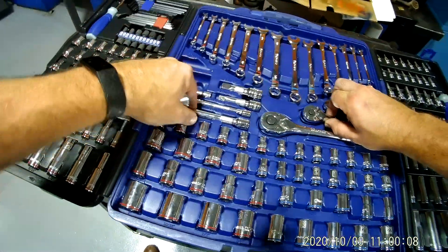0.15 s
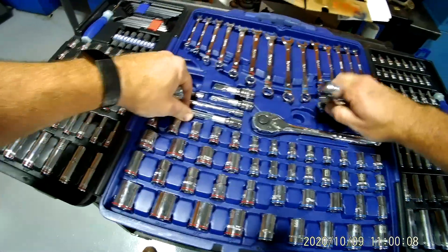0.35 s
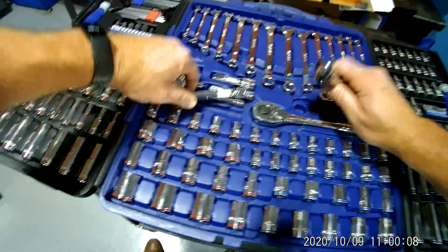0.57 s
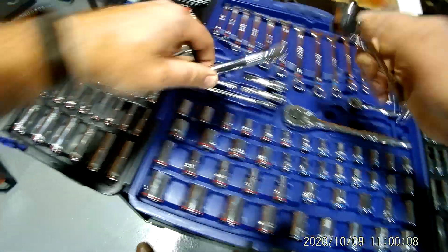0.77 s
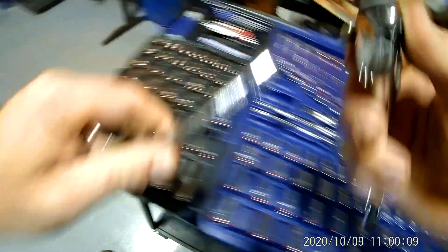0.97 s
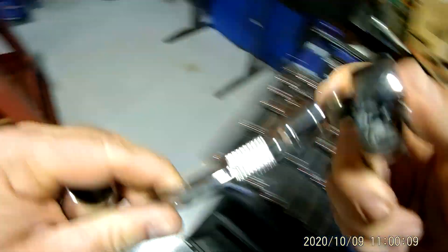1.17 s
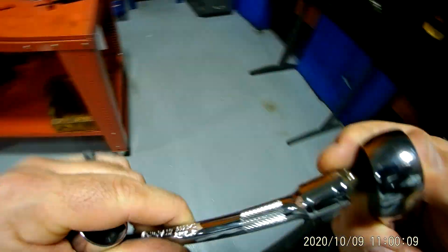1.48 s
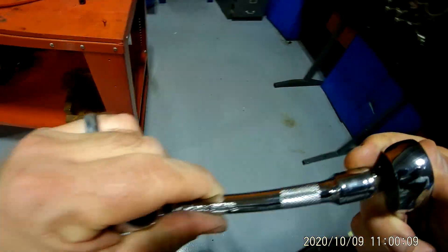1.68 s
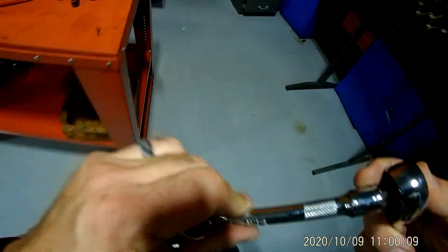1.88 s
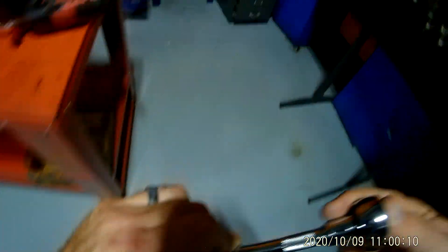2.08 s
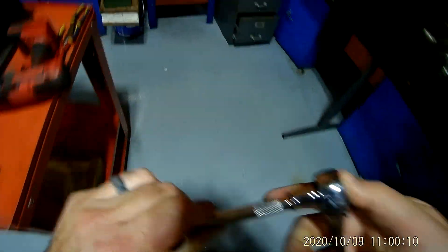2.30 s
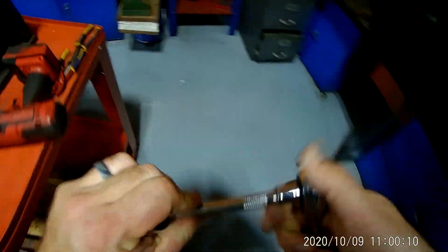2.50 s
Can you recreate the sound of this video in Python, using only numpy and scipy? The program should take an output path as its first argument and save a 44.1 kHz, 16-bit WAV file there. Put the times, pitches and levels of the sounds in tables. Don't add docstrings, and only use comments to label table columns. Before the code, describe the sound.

Steel ratchet and extension bar knock out of a hollow plastic tool tray, click together, then rattle

```python
import sys
import numpy as np
from scipy import signal
from scipy.fft import rfft, irfft
from scipy.io import wavfile
from scipy.ndimage import uniform_filter1d

SR = 44100
rng = np.random.default_rng(int(sys.argv[2]) if len(sys.argv) > 2 else 0)


def linear_from_db(decibels):
    return 10 ** (np.asarray(decibels, float) / 20)


def to_wav(sig):
    pcm = np.clip(np.atleast_2d(sig), -1, 1) * 32767
    pcm = np.round(pcm).astype(np.int16)
    wavfile.write(sys.argv[1], SR, pcm.T)


N = 116865

# hz, level_db_per_hz
STEEL_CONTACT = [(500, -21.5), (1600, -0.5), (2600, -9), (4200, 0), (6900, -3), (8300, -17), (10000, -14),
                 (16000, -30)]


def evened(x):
    return x / np.sqrt(np.mean(x ** 2) + 1e-20)


def add(mix, start_s, sound):
    part = mix[round(start_s * SR):][:len(sound)]
    part += sound[:len(part)]


def noise(colour, size):
    colour_hz, colour_db = np.transpose(colour)
    hz = np.fft.rfftfreq(size, 1 / SR)
    level_db = np.interp(np.log(hz + 1), np.log(colour_hz + 1), colour_db)
    return evened(irfft(rfft(rng.standard_normal(size)) * linear_from_db(level_db), size))


def ring(modes, spread_db, detune, rise_s):
    wobble, wobble_s = 0.006, 0.002
    hz, db, t60_s = np.transpose(modes)[:, :, None]
    t = np.arange(16384) / SR
    level_draw, pitch_draw = rng.standard_normal((2, len(modes), 1))
    knots_s = np.arange(0, 16384 / SR, wobble_s)
    steps = rng.standard_normal((len(modes), len(knots_s)))
    drift_s = np.array([np.interp(t, knots_s, wobble * wobble_s * np.cumsum(w)) for w in steps])
    turns = hz * ((1 + detune * pitch_draw) * t + drift_s * hz / 8000)
    decay = linear_from_db(db + spread_db * level_draw - 60 * t / t60_s)
    return (decay * np.sin(2 * np.pi * turns)).sum(0) * (1 - np.exp(-t / rise_s))


def crack(colour, t60_s):
    t = np.arange(4096) / SR
    return noise(colour, size=4096) * linear_from_db(-60 * t / t60_s) * np.minimum(t / 0.0004, 1)


def steel(hits, modes, crack_t60_s):
    out = np.zeros(N)
    for start_s, peak_db, crack_db in hits:
        add(out, start_s, linear_from_db(peak_db - 6) * ring(modes, spread_db=2, detune=0.004, rise_s=0.0003))
        add(out, start_s, linear_from_db(peak_db + crack_db - 9) * crack(STEEL_CONTACT, crack_t60_s))
    return out


def room_air():
    # hz, level_db_per_hz
    air_colour = [(20, -7), (145, -2), (480, -7), (1700, -22.5), (2800, -24), (4200, -32), (8000, -33),
                  (15800, -31)]
    return linear_from_db(-61) * noise(air_colour, size=N)


def rubbing():
    # start_s, level_db
    motion = [(0, -65), (.06, -62), (.19, -67.5), (0.228, -46.5), (.5, -46), (0.8, -53), (1.219, -62.5),
              (1.282, -54), (1.45, -71), (1.898, -67), (2.129, -52.5), (2.239, -59), (2.36, -57),
              (2.519, -53.5), (2.65, -60)]
    # hz, level_db_per_hz
    rub_colour = [(100, -10), (250, -5), (1700, -9), (2800, -27), (4200, -17.5), (9000, -33.5),
                  (16000, -37)]
    start_s, level_db = np.transpose(motion)
    grain = evened(uniform_filter1d(rng.standard_normal(N), size=200))
    envelope_db = np.interp(np.arange(N) / SR, start_s, level_db) + 1.3 * grain
    return noise(rub_colour, size=N) * linear_from_db(envelope_db)


def tray():
    # start_s, peak_db, crack_db, thud_db, pocket_hz
    knocks = [(0.0101, -42.5, -4.5, 11, 1040), (0.21, -30.5, -23, -6.5, 1060),
              (0.2158, -15, -19.5, -5.5, 1142), (0.223, -25.5, -2, -12, 1135),
              (0.251, -16.5, -3.5, -11, 1050), (0.3251, -5, -9.5, -14.5, 1154), (0.351, -8, 1, -12, 1170),
              (0.3542, -2.5, -12, -9.5, 1113), (.364, -15.5, -21.5, -6, 1070),
              (0.3827, -12.5, -14.5, -13, 1086), (0.39, -12.5, -13, -9, 1066), (.404, -22, -15, -11, 1167),
              (0.4993, -18, -4.5, -7, 1183), (0.505, -25, -1, -10.5, 1156), (0.5515, -34, -3, -8.5, 1186),
              (0.553, -21.5, -4.5, -2.5, 1206), (0.5552, -25, -12, 7.5, 960),
              (0.573, -20.5, 11.5, 0.5, 1260), (0.593, -22, -3.5, 4, 1213), (2.488, -36, -36, -0.5, 980),
              (2.505, -35.5, -7, -10, 925), (2.518, -38, -2, -2.5, 960)]
    # multiple_of_pocket_hz, level_db, t60_s
    pocket_modes = [(.78, -9, 0.041), (1, 6.5, 0.017), (1.1, -7.5, 0.014), (1.46, -13.5, 0.015),
                    (1.96, -8, 0.02)]
    # hz, level_db_per_hz
    plastic_contact = [(180, -33.5), (300, 3.5), (1240, 0), (2170, -23.5), (3230, -18.5), (5550, -15),
                       (8150, -32), (9000, -56.5), (11700, -92), (19800, -120)]
    # hz, level_db, t60_s
    case_modes = [(158, -15, 0.24), (216.6, -4.5, 0.11), (316, 2.5, 0.046), (445, 1, 0.06), (637, 0, 0.045)]
    out = np.zeros(N)
    for start_s, peak_db, crack_db, thud_db, pocket_hz in knocks:
        modes = np.multiply(pocket_modes, [pocket_hz, 1, 1])
        add(out, start_s, linear_from_db(peak_db - 4) * ring(modes, spread_db=1, detune=0.015, rise_s=0.001))
        add(out, start_s, linear_from_db(peak_db + crack_db) * crack(plastic_contact, 0.019))
        boom = ring(case_modes, spread_db=3, detune=0.06, rise_s=0.002)
        add(out, start_s, linear_from_db(peak_db + thud_db - 6) * boom)
    return out


def ticks():
    # start_s, peak_db, pitch_hz, t60_s
    tick_hits = [(.167, -45.5, 10320, 0.01), (0.174, -67.5, 10000, .02), (.234, -38.5, 4830, 0.035),
                 (0.2659, -28, 4840, 0.013), (.385, -25, 3940, 0.017), (.892, -45, 4880, 0.022),
                 (1.0144, -56.5, 3430, 0.014), (1.017, -47, 4170, .02), (1.0361, -24, 8200, 0.0072),
                 (1.0413, -30, 7970, 0.01), (1.221, -50.5, 9580, 0.013), (1.221, -46, 4900, .01),
                 (1.9915, -49, 6200, .008), (1.743, -58.5, 3750, 0.021), (1.8815, -40, 4030, 0.031),
                 (1.9961, -36, 4866, 0.024), (2.111, -51, 3760, 0.013), (2.2333, -41, 3340, .012),
                 (2.233, -32.5, 4900, 0.019), (2.2332, -35, 5650, .01)]
    out = np.zeros(N)
    for start_s, peak_db, pitch_hz, t60_s in tick_hits:
        modes = [(pitch_hz, 0, t60_s), (pitch_hz * 1.4, -10, t60_s)]
        add(out, start_s, linear_from_db(peak_db) * ring(modes, spread_db=0, detune=0, rise_s=0.00017))
        add(out, start_s, linear_from_db(peak_db - 9) * crack(STEEL_CONTACT, 0.017))
    return out


def bar():
    # start_s, peak_db, crack_db
    bar_hits = [
        (.5713, -10.5, -8),
        (.5732, -9.5, -16),
        (.5765, -19, -1),
        (.588, -46, -1.5),
        (.5945, -41.5, 9.5),
    ]
    # hz, level_db, t60_s
    bar_modes = [(1740, -1.5, 0.026), (1923, -12.5, 0.035), (4138, -6.5, 0.035), (4535, 2.5, 0.023),
                 (4720, 0.5, 0.016), (5580, -1.5, 0.018), (6580, 5.5, 0.017), (8220, -4.5, 0.02),
                 (8900, -13, 0.04), (10000, -16.5, 0.04), (10640, -21.5, .04), (12400, -26, 0.08),
                 (15370, -29, .05)]
    # hz, level_db, t60_s
    free_modes = [(1653, -2, 0.22), (8690, -4.5, .2), (9300, -7, .1), (14240, -14.5, .2)]
    return steel(bar_hits, bar_modes, 0.014) + steel([(0.5735, -21, -20.5)], free_modes, 0.01)


def pawl():
    # start_s, peak_db, crack_db
    pawl_hits = [
        (1.0357, -32, -29),
        (1.047, -38.5, -26),
    ]
    # hz, level_db, t60_s
    pawl_modes = [(9870, -12, 0.05), (10300, -12, 0.05), (12500, 6, 0.055), (13190, -14, .05),
                  (15330, -14, 0.05)]
    return steel(pawl_hits, pawl_modes, 0.01)


def ratchet():
    # start_s, peak_db, crack_db
    click_hits = [(1.0358, -18.5, -1.5), (1.039, -33, 1), (1.0415, -17.5, -4.5), (1.0434, -21, 2),
                  (1.0455, -32.5, -6), (1.0473, -17, -13), (1.069, -40, -4), (1.076, -42, 11),
                  (1.2385, -32.5, 8.5), (1.2535, -50, 6), (1.3235, -41, 6), (1.3262, -19, -0.5),
                  (1.3344, -10.5, -2)]
    # hz, level_db, t60_s
    ratchet_modes = [(1644, -22.5, 0.02), (3316, -15, 0.022), (4200, -13.5, 0.019), (5790, -10, 0.0096),
                     (6767, 0, 0.017), (7100, -22, .008)]
    return steel(click_hits, ratchet_modes, 0.01)


def squeak():
    start_s, length_s, pitch_hz, rise = 1.044, 0.026, 3000, 0.3
    # multiple_of_pitch, level_db
    partials = [(.53, -46), (1, -35), (2, -42), (2.25, -29)]
    out = np.zeros(N)
    u = np.arange(0, 1, 1 / (length_s * SR))
    for multiple, level_db in partials:
        glide = 1 + rise / max(multiple, 1) ** 2 * u ** 2
        turns = np.cumsum(multiple * pitch_hz * glide) / SR
        rough = 1 + 0.39 * evened(uniform_filter1d(rng.standard_normal(len(u)), size=40))
        envelope = linear_from_db(level_db + 2 - 16 * u) * np.sqrt(np.sin(np.pi * u))
        add(out, start_s, envelope * rough * np.sin(2 * np.pi * turns))
    return out


def taps():
    # start_s, peak_db, crack_db
    tap_hits = [
        (1.879, -44, 2),
        (1.882, -24.5, 2.5),
        (1.886, -47, 0.5),
        (1.9955, -39.5, -2.5),
        (2.2325, -30, -3),
    ]
    # hz, level_db, t60_s
    tip_modes = [(3330, -28, 0.0095), (4795, -5, 0.021), (5850, 4, 0.015), (6040, 3, 0.018)]
    return steel(tap_hits, tip_modes, 0.014)


def socket():
    stop_s, last_ring_s = 0.0009, 0.019
    # start_s, peak_db, high_mode_db, crack_db
    bounces = [(2.278, -37, -21, -34), (2.2928, -28.5, -19, -26), (2.3035, -27, -20, -25),
               (2.3145, -25.5, -3, -29), (2.3213, -20, -11, -27), (2.33, -32, -31, -27),
               (2.3295, -31, -32, -31), (2.3361, -42, -23, -26.5), (2.3409, -33, -26, -26),
               (2.3445, -28, -22, -26), (2.3505, -43, -21, -25), (2.3565, -29.5, -23, -21.5),
               (2.3632, -34, -29, -25), (2.3712, -26.5, -21.5, -30), (2.3741, -25, -21, -31),
               (2.378, -34, -17, -26), (2.3904, -31, -18, -24), (2.3975, -27.5, -25, -33),
               (2.4012, -37, -32, -34), (2.4093, -28.5, -19.5, -27.5), (2.4226, -32, -27, -25),
               (2.4253, -35, -23, -30), (2.4403, -26, -22, -29), (2.443, -33.5, -24, -34),
               (2.4593, -28, -15.5, -27), (2.4735, -24, -18.5, -32), (2.4887, -25, -27, -27.5),
               (2.497, -30.5, -48, -40)]
    # hz, level_db, t60_s
    low_modes = [(1444, -16.5, 0.021), (3930, -10.5, 0.02), (4840, 3, 0.06), (5570, -14, 0.0092),
                 (6240, -13.5, 0.026)]
    # hz, level_db, t60_s
    high_modes = [(9690, -3, 0.016), (9856, 2.5, 0.02), (9970, -14.5, 0.012), (14300, -19.5, .01)]
    # hz, level_db_per_hz
    socket_contact = [(500, -16.5), (3000, -14), (4200, 1.5), (6500, 0), (8500, -9.5), (14500, -6.5),
                      (16200, -15)]
    out = np.zeros(N)
    t = np.arange(16384) / SR
    gaps_s = np.append(np.diff(np.transpose(bounces)[0]), last_ring_s)
    for (start_s, peak_db, high_db, crack_db), gap_s in zip(bounces, gaps_s):
        free = np.exp(-np.maximum(t - gap_s, 0) / stop_s)
        low = ring(low_modes, spread_db=2, detune=0.006, rise_s=0.0008)
        high = ring(high_modes, spread_db=1, detune=0.004, rise_s=0.0009)
        add(out, start_s, free * linear_from_db(peak_db) * low)
        add(out, start_s, free * linear_from_db(high_db) * high)
        impact = linear_from_db(-4.5) * crack(socket_contact, 0.026)
        scrape = linear_from_db(-13) * crack(socket_contact, 0.069)
        add(out, start_s, linear_from_db(crack_db) * (impact + scrape))
    return out


def shop(x):
    tail_db, near_db, near_t60_s = -15, -9.5, 0.098
    # hz, t60_s
    shop_decay = [(100, 1.1), (1500, 1.1), (6000, 0.58), (16000, 0.97)]
    hz, t, z = signal.stft(rng.standard_normal(3 * SR // 2), SR, nperseg=256)
    decay_hz, decay_s = np.transpose(shop_decay)
    t60_s = np.interp(np.log(hz + 1), np.log(decay_hz), decay_s)[:, None]
    tail = signal.istft(z * linear_from_db(-60 * t / t60_s), SR, nperseg=256)[1]
    t = np.arange(len(tail)) / SR
    tail = tail * np.minimum(t / 0.0062, 1)
    near = rng.standard_normal(len(t)) * linear_from_db(-60 * t / near_t60_s) * np.minimum(t / 0.001, 1)
    tail = linear_from_db(tail_db) * tail / np.linalg.norm(tail)
    near = linear_from_db(near_db) * near / np.linalg.norm(near)
    return signal.fftconvolve(x, tail + near)[:N]


def below(x, cutoff_hz):
    taper = signal.firwin(301, cutoff_hz, window=("kaiser", 9), fs=SR)
    return signal.oaconvolve(x, taper[None], "same")


def scene():
    bench = tray() + bar() + ticks()
    bench = signal.sosfilt(signal.butter(2, 120, "high", fs=SR, output="sos"), bench)
    held = ratchet() + taps() + squeak()
    loose = socket() + pawl()
    send = bench + linear_from_db(-7) * (held + linear_from_db(-6) * loose)
    return (bench + held + loose + shop(send) + rubbing() + room_air())[None]


def roll_off(x):
    return signal.sosfilt(signal.butter(12, 16810, fs=SR, output="sos"), x)


def record(dry):
    # from_s, to_s
    dull_spans = [
        (.210, .371),
        (.499, .593),
        (1.012, 1.040),
        (1.236, 1.361),
        (1.874, 1.903),
        (1.968, 2.000),
        (2.228, 2.321),
    ]
    t = np.arange(N) / SR
    inside = sum((t > from_s) & (t < to_s) for from_s, to_s in dull_spans) * 1.0
    dull = uniform_filter1d(inside, size=120)
    low = below(dry, 8550)
    treble = below(dry, 15850) - low
    return roll_off(low + (1 - dull) * treble)


dry = scene()
out = record(dry)
to_wav(out)
```